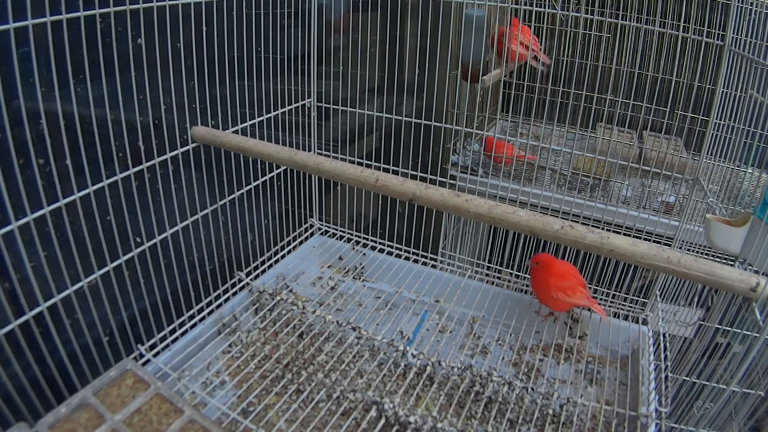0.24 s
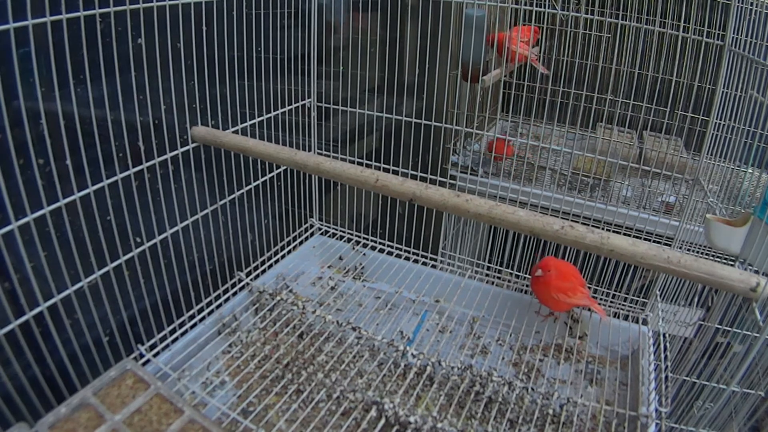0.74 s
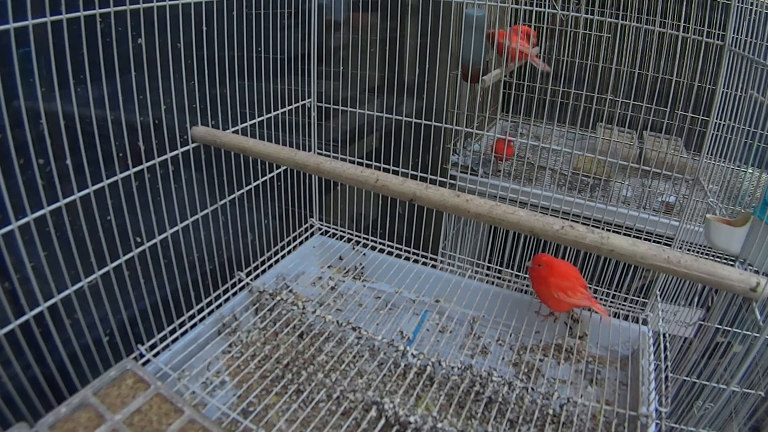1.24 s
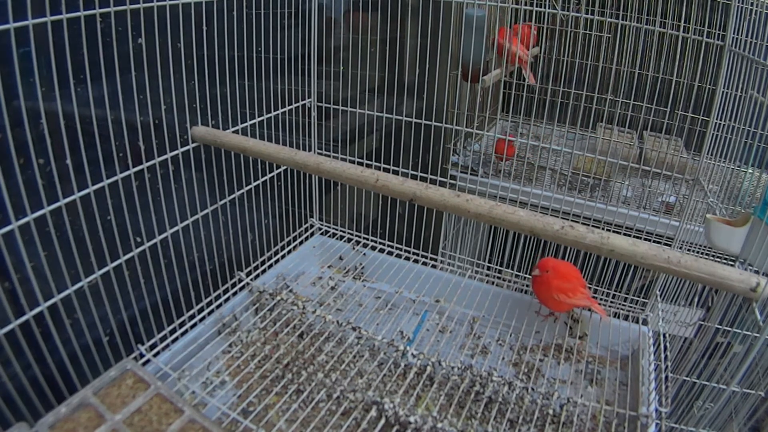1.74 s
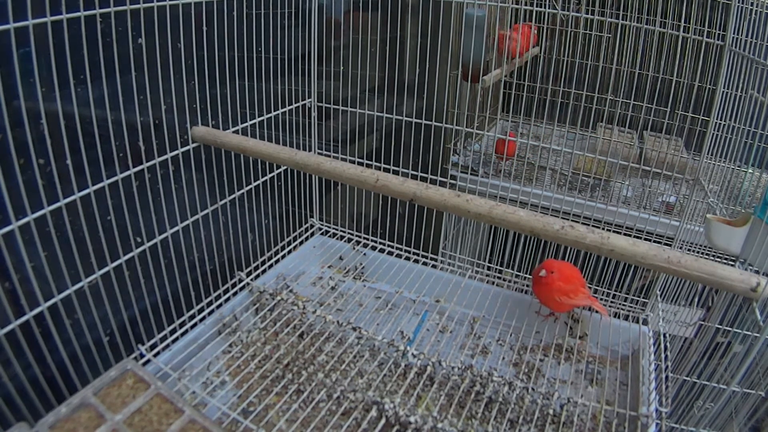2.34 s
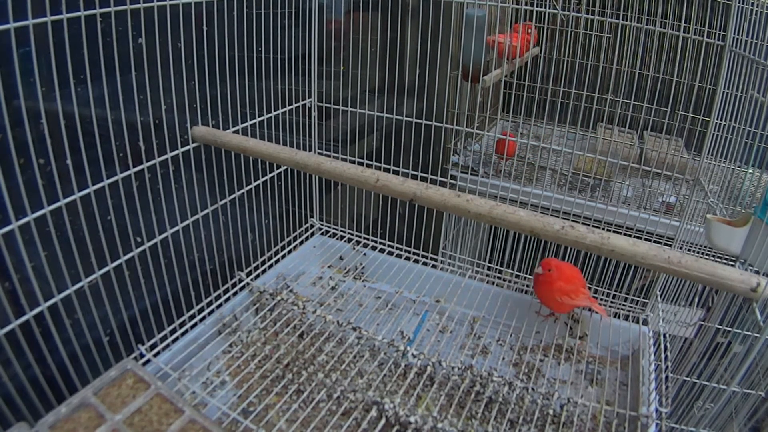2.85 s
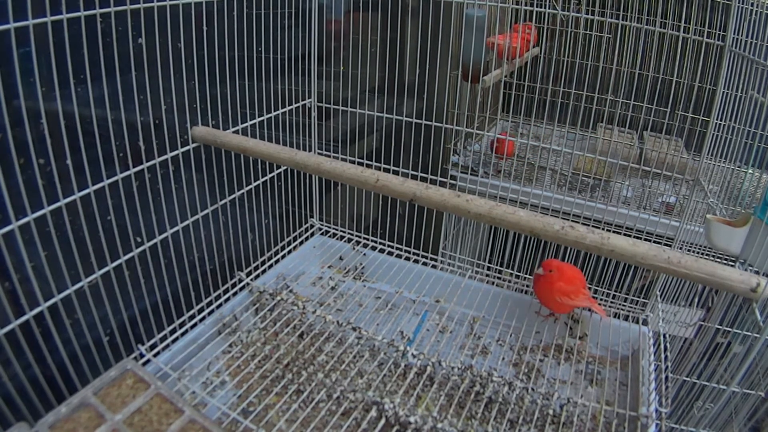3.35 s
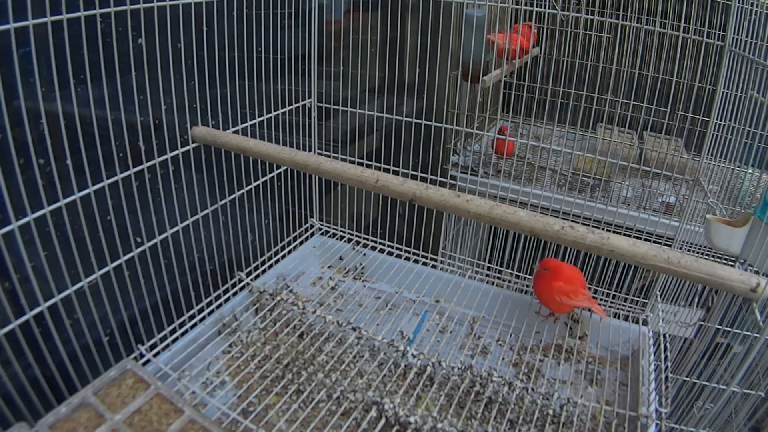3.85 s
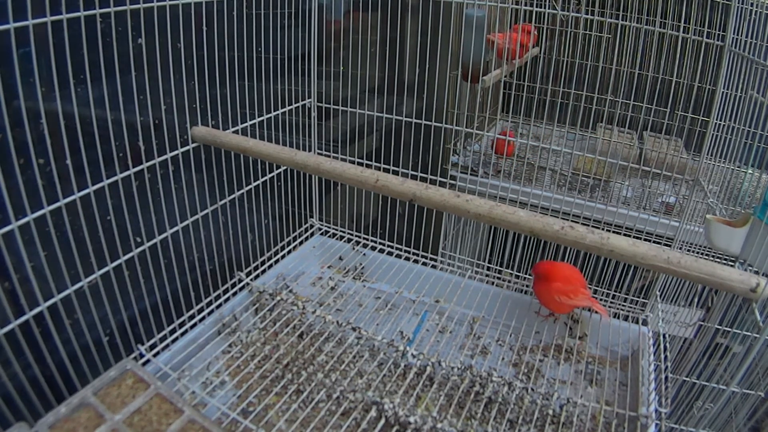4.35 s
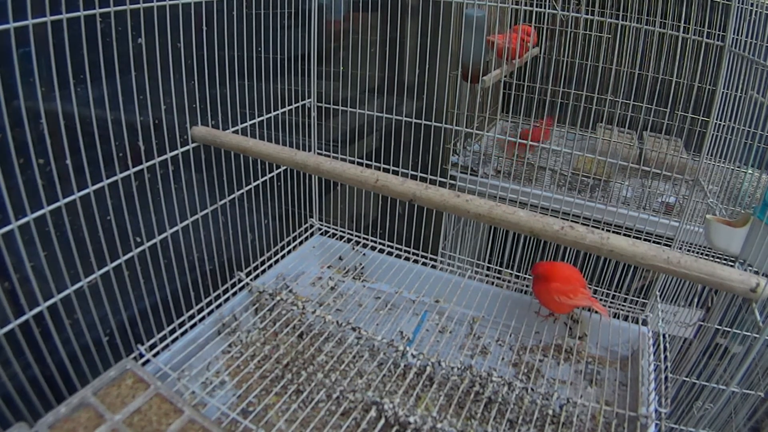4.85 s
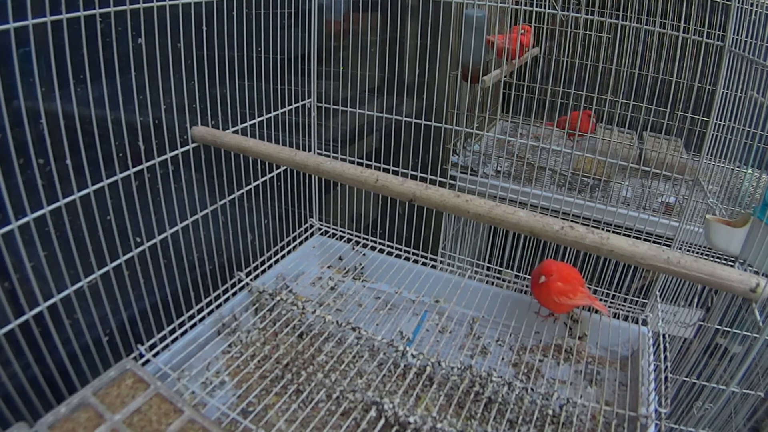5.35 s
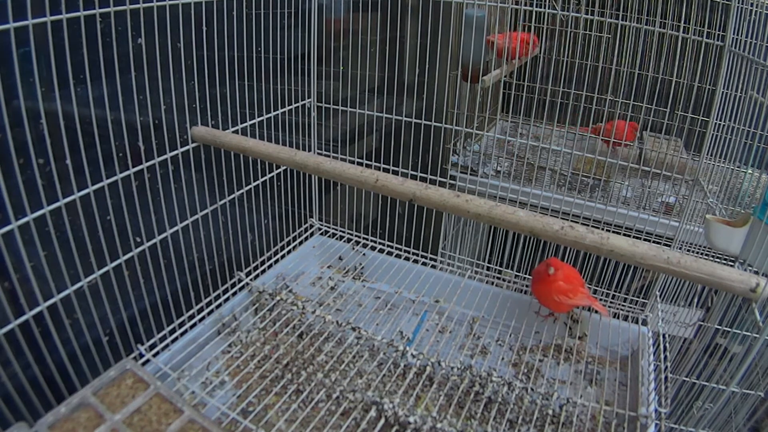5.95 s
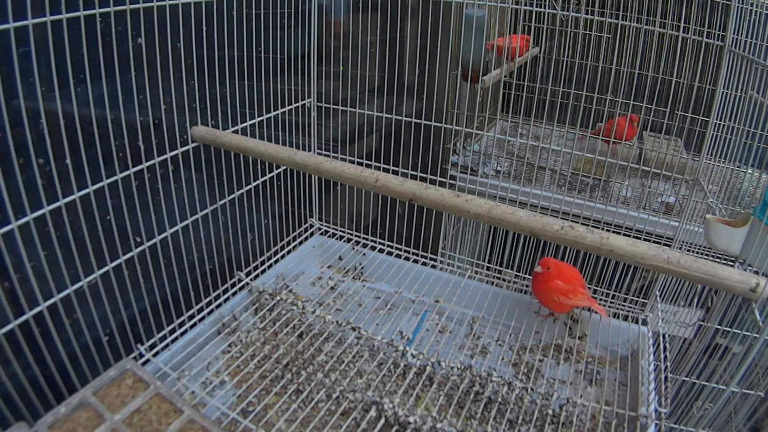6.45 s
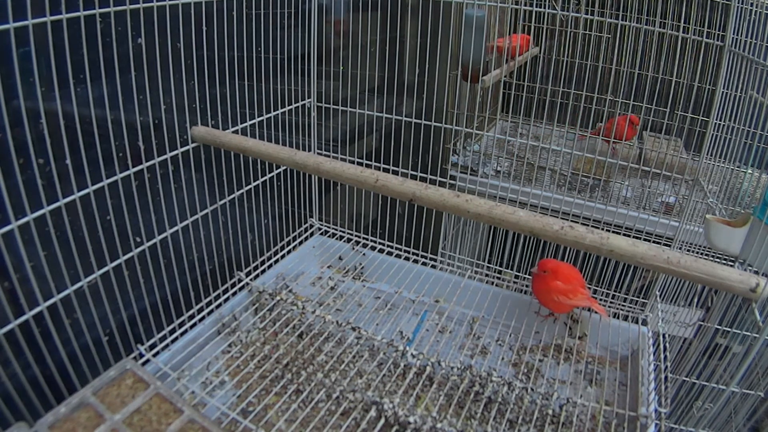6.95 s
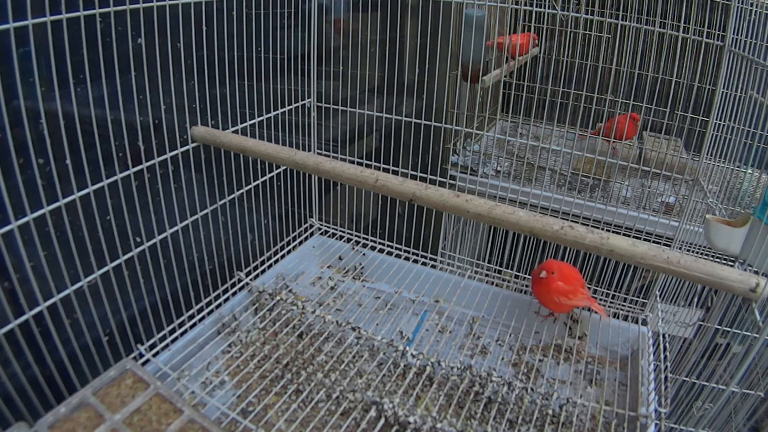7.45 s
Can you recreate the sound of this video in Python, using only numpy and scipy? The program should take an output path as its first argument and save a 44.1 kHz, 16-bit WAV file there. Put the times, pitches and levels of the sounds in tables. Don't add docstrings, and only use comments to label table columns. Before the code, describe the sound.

Several caged canaries sing over one another in a small hard room, fast rattling trills and sharp falling whistles, with wing and wire rustles and faint wind.

```python
import sys
import numpy as np
from scipy import signal
from scipy.fft import rfft, irfft
from scipy.io import wavfile
from scipy.ndimage import uniform_filter1d

SR = 44100
rng = np.random.default_rng(int(sys.argv[2]) if len(sys.argv) > 2 else 0)


def wav_record(signal):
    frames = np.transpose(np.atleast_2d(signal))
    bounded = np.clip(frames, -1, 1)
    quanta = np.round(bounded * 32767).astype(np.int16)
    wavfile.write(sys.argv[1], SR, quanta)


def ratio_of_db(decibels):
    return 10 ** (np.asarray(decibels, float) / 20)


N = 340011
SIDES = np.array([[1], [-1]])


def level(x, db):
    return x * ratio_of_db(db) / np.sqrt(np.mean(x ** 2))


def colour(x, points):
    hz, db = np.transpose(points)
    bins = np.maximum(np.arange(N // 2 + 1) * SR / N, 1)
    return irfft(rfft(x) * ratio_of_db(np.interp(np.log(bins), np.log(hz), db)), N)


def band(x, hz, width_hz):
    return signal.lfilter(*signal.iirpeak(hz, hz / width_hz, fs=SR), x)


def walk(rate):
    hold = int(SR / rate)
    held = rng.standard_normal(N // 8)[np.arange(N) // hold]
    return 1.14 * uniform_filter1d(uniform_filter1d(held, hold), hold)


def add(out, s, piece):
    i = int(s * SR)
    out[i:i + len(piece)] += piece[:N - i]


def syrinx(notes, partials_db, bend=0.4, settle=0.96, edge=0.25, swell_db=0.0, wobble=0.006, flutter_db=6.5):
    out = np.zeros(N)
    waver = 1 + wobble * walk(400)
    for (s, length, start_hz, bend_hz, end_hz, db), partials in zip(notes, partials_db):
        u = np.arange(int(length * SR)) / (length * SR)
        glide = np.interp(u, [0, bend, settle], [start_hz, bend_hz, end_hz])
        glide = uniform_filter1d(glide, len(u) // 4 + 1, mode="nearest")
        i = min(int(s * SR), N - len(u))
        phase = 2 * np.pi * np.cumsum(glide * waver[i:i + len(u)]) / SR
        fades = np.clip(np.minimum(u, 1 - u) / edge, 0, 1)
        effort = fades * ratio_of_db(db + swell_db * (u - 0.5))
        tone = sum(ratio_of_db(p) * np.sin((k + 1) * phase) for k, p in enumerate(partials))
        add(out, s, effort * tone)
    return out * ratio_of_db(flutter_db * walk(250))


def outdoors():
    # time in seconds, wind rumble in dB, coo in dB.
    air = [(0.0, -45, -60), (0.26, -52, -66), (0.97, -47, -69.5), (1.09, -43, -57), (1.87, -50, -68.5),
           (2.38, -47.5, -62), (2.53, -42, -50.5), (2.62, -45, -61), (3.24, -52.5, -71.5), (3.35, -54, -53),
           (3.82, -49.5, -72), (4.12, -57.5, -71), (4.51, -52.5, -73.5), (4.55, -44, -52.5),
           (5.15, -57.5, -71), (5.28, -48.5, -76.5), (5.75, -56.5, -70), (5.91, -48, -84), (6.01, -49, -72),
           (6.21, -46, -42), (6.74, -55.5, -64), (6.83, -54, -63), (6.91, -54, -71), (7.04, -48, -51.5),
           (7.36, -44, -61), (7.49, -48, -53), (7.71, -48, -73)]
    # frequency in Hz, weight in dB per Hz.
    wind_spectrum = [(12, -44), (20, -6.5), (54, 1.5), (70, 2.5), (102, -7.5), (138, -0.5), (193, -5.5),
                     (269, -19.5), (380, -18.5), (490, -51), (840, -120)]
    hiss_spectrum = [(150, -16.5), (250, -1.5), (500, -5), (900, -5), (1400, -4.5), (2500, -2.5),
                     (5000, -7.5), (8000, -10.5), (10500, -18.5), (12000, -36)]
    s, wind_db, coo_db = np.transpose(air)
    mid, side, hum, left, right = rng.standard_normal((5, N))

    wind = level(colour(mid, wind_spectrum), 0) * ratio_of_db(-0.7 * SIDES)
    wind = wind + level(colour(side, wind_spectrum), -19) * SIDES

    coo_hz, coo_width_hz = 416.1, 16
    coo = level(band(band(hum, coo_hz, coo_width_hz), coo_hz, coo_width_hz), 0)

    hiss_db = -50.5
    hiss = level(np.array([colour(left, hiss_spectrum), colour(right, hiss_spectrum)]), hiss_db + 2.0)
    hiss = hiss + level(band(side, 620.0, 450.0), hiss_db - 7.5) * SIDES

    time = np.arange(N) / SR
    gust_db = np.interp(time, s, wind_db) + 1.4 * walk(12)
    swell = ratio_of_db(np.interp(time, s, coo_db))
    return wind * ratio_of_db(gust_db) + coo * swell + hiss * ratio_of_db(0.94 * walk(1.7))


def whistles(rows, swell_db, octave_db=-36, stretch=1.3):
    notes = [(s, stretch * length, *rest) for s, length, *rest in rows]
    return syrinx(notes, [(0.017, octave_db)] * len(notes), bend=0.31, settle=0.78, edge=0.096,
                  swell_db=swell_db, wobble=0.013, flutter_db=2.5)


def trill():
    # start in seconds, peak level in dB, held pitch in Hz.
    phrases = [
        [(0.0164, -25.5, 2880)] + [(0.0588, -28, 2705), (0.0982, -20.5, 3000), (0.159, -25.5, 2890), (0.2324, -19.5, 2680), (0.2853, -25, 3400), (0.3411, -30, 2640), (0.4015, -42, 2500), (0.4923, -22.5, 3540), (0.5332, -20, 3610), (0.6055, -23.5, 3440), (0.6469, -25, 3430), (0.6993, -17.5, 3460), (0.7452, -22, 3400), (0.7876, -17.5, 3446), (0.8395, -18.5, 3480), (0.8979, -19, 3540), (0.9383, -21.5, 3460), (0.9951, -19, 3270), (1.0445, -18.5, 3430)],
        [(1.1263, -29.5, 2656), (1.1794, -30, 2824), (1.2201, -27.5, 2680)] + [(1.2879, -23.5, 3270), (1.3572, -32.5, 3290), (1.3931, -27.5, 3530), (1.453, -34, 3170), (1.5513, -34, 2830), (1.6086, -32.5, 2920), (1.672, -35, 2456), (1.7209, -37, 2830), (1.7852, -37, 2820), (1.8256, -34.5, 2870), (1.88, -33, 2805), (1.9434, -36, 2960), (1.9903, -32.5, 2916), (2.0456, -33.5, 2920), (2.1015, -32.5, 2850), (2.1534, -30.5, 2590), (2.2088, -25, 3030), (2.2701, -27.5, 2880), (2.327, -26.5, 2750), (2.3764, -32, 3200), (2.4328, -29, 3220), (2.4792, -23.5, 2950), (2.5255, -25.5, 3166), (2.5719, -27, 2790), (2.6099, -28.5, 2900), (2.6543, -25.5, 2916), (2.7056, -25.5, 2995), (2.7485, -31, 2810), (2.7939, -31, 2820), (2.8373, -22.5, 2970), (2.8877, -26.5, 2960), (2.9281, -18, 2933), (2.985, -23.5, 3028), (3.0354, -36.5, 2770), (3.0873, -30.5, 2820), (3.1441, -27.5, 2984), (3.199, -30.5, 3084), (3.2559, -25, 2820), (3.3227, -23, 3103), (3.3836, -23, 3056), (3.4415, -22, 3210), (3.5003, -21, 2950)] + [(3.5563, -20.5, 3200), (3.6227, -29, 3090), (3.6865, -26.5, 3100)],
        [(3.7778, -18.5, 2580), (3.8132, -23.5, 2704), (3.8611, -19.5, 2646), (3.9394, -25, 2530), (4.0247, -21, 2780), (4.0676, -22.5, 2680), (4.1345, -16, 2578), (4.2058, -19, 2668), (4.2906, -20.5, 2490), (4.3839, -19.5, 2540), (4.4283, -21, 2540)],
        [(4.9952, -23.5, 2694), (5.0301, -25.5, 2700), (5.065, -24.5, 2890), (5.1099, -21, 2575), (5.1563, -23.5, 3130), (5.1962, -24.5, 2790), (5.2451, -21, 2850), (5.311, -12, 3066), (5.3469, -15, 3054), (5.3903, -10.5, 3324), (5.4861, -12, 3050), (5.5479, -20.5, 2750), (5.5789, -22.5, 2840), (5.6163, -19.5, 3194), (5.6991, -16, 2780), (5.7485, -14, 3016), (5.7964, -17.5, 3496), (5.8408, -22, 2690), (5.8737, -19.5, 3700), (5.9316, -19, 3540), (5.973, -27, 2900), (6.0074, -27, 2970), (6.0483, -21, 3360), (6.0972, -23, 2850), (6.1371, -21.5, 3530), (6.188, -21, 3400), (6.2329, -21.5, 3385), (6.3092, -29.5, 3370)],
        [(6.3357, -16.5, 3150), (6.4006, -22.5, 3550), (6.5054, -23.5, 3060), (6.5513, -26, 3180), (6.5992, -32.5, 3220), (6.6391, -23.5, 2900), (6.6984, -23.5, 2934), (6.7488, -20.5, 2890), (6.7942, -21.5, 2960), (6.8461, -27, 3180), (6.8835, -17.5, 2940), (6.9474, -18.5, 3130)],
        [(6.9398, -19.5, 2875), (6.9837, -28, 3097), (7.0401, -20, 3140), (7.078, -25, 3270), (7.1493, -23.5, 3033), (7.2052, -32, 3150), (7.2486, -20.5, 3010), (7.3514, -17, 3170), (7.4092, -18.5, 2425), (7.4846, -20.5, 2710), (7.5389, -21, 2515), (7.6272, -26, 2927), (7.6766, -22.5, 2620)],
    ]
    # start pitch as share of held, length in seconds, buzz from 0 to 1,
    # level shift in dB, pitch in Hz and level in dB of the answering side of the syrinx.
    manners = [(0.801, 0.0346, .3, -7, 2420, -15.5), (.93, 0.0334, 0.098, 2, 2188, -15),
               (1.1, 0.0478, .1, -8.5, 2207, -16.5), (0.802, 0.0347, .4, -6.5, 2275, -22.5),
               (.97, .04, 0.18, -8, 2600, -19.5), (1.08, 0.0414, 0.45, -10.5, 2490, -9.5)]
    answer_s = 0.024
    out = 0
    for rows, (share, length, buzz, shift_db, low_hz, low_db) in zip(phrases, manners):
        notes = [(s - 0.002, length, share * hz, hz, hz, db + shift_db) for s, db, hz in rows]
        notes += [(s + answer_s, length, 0.92 * low_hz, low_hz, 1.12 * low_hz, db + shift_db + low_db)
                  for s, db, hz in rows]
        tone = syrinx(notes, [(0, -30)] * len(notes), bend=0.2985, edge=0.068, swell_db=1,
                      wobble=0.015, flutter_db=2.0)
        out = out + tone * (1 + buzz * walk(700))
    return out


def flock(song):
    # frequency in Hz, weight in dB per Hz.
    haze_spectrum = [(800, -23), (1300, -14.5), (1800, -12), (2300, 6.5), (3100, 10.5), (3800, -5.5),
                     (6500, -14.5), (10000, -29)]
    loudness = np.abs(uniform_filter1d(np.abs(song), int(0.015 * SR)))
    haze = level(colour(rng.standard_normal(N), haze_spectrum), 0)
    return level(loudness, -38) * haze


def rustles():
    # start in seconds, peak level in dB, decay in seconds, lows and middle against highs in dB.
    bursts = [(0.0613, -25, 0.005, -10, 1.8), (0.3396, -10, 0.0092, -9.5, 1.2),
              (0.7332, -40, 0.005, -8.5, 1.2), (0.7915, -32.5, 0.0125, -11, 1.5),
              (1.1378, -22, 0.011, -14.5, 1.9), (1.652, -39, 0.016, 6, 1.5), (2.0413, -28, 0.005, -9, 1.3),
              (2.2808, -30.5, 0.027, -10, 1.7), (2.8789, -27, 0.01, -8, 1.5),
              (2.9205, -22.5, 0.011, -21, 2.5), (2.951, -33.5, 0.015, -9, 1.5),
              (2.9794, -27, 0.014, -21.5, 1.5), (3.852, -46, 0.012, 36, 1.5), (4.829, -41, 0.015, 13, 1.5),
              (4.9257, -33, 0.013, -1, 1.5), (4.9944, -31.5, 0.015, -22, 3.3),
              (5.396, -46, 0.015, -21, 2.5), (5.7498, -19.5, 0.017, -36, 3.3),
              (5.769, -25, 0.016, -29, 4.5), (5.7982, -38, 0.015, -11, 1.5),
              (5.9413, -32.5, 0.015, -9, 1.6)]
    # resonance in Hz, its width in Hz, level in dB.
    wire = [
        (1340, 117, 1),
        (5200, 800, 0.5),
        (7900, 12000, 1.5),
    ]
    grains = rng.standard_normal(N) * ratio_of_db(8.0 * walk(600))
    low, mid, high = (level(band(grains, hz, width_hz), db) for hz, width_hz, db in wire)
    out = np.zeros(N)
    for s, db, length, low_db, mid_db in bursts:
        i = int(s * SR)
        fade = np.exp(-np.arange(6000) / (max(length, 0.002) * SR))
        part = slice(i, i + len(fade))
        ring = ratio_of_db(min(low_db, 0)) * low[part] + ratio_of_db(mid_db) * mid[part] + high[part]
        add(out, s, ratio_of_db(db - 14) * fade * ring)
    return out


def roll():
    # time in seconds, peak level in dB, top pitch in Hz.
    flicks = [(0.1048, -19, 3720), (0.1512, -21.5, 3990), (0.2215, -17, 3890), (0.2864, -20, 4150),
              (0.3343, -39, 4030), (0.437, -23, 3750), (0.4804, -16, 3710), (0.5313, -27.5, 3710),
              (0.6041, -20, 3765), (0.6545, -22, 4050), (0.7049, -36.5, 3740), (0.7553, -21, 3640),
              (0.7987, -22, 3750), (0.8396, -18.5, 3650), (0.891, -21.5, 3850), (0.9384, -24, 3900),
              (0.9803, -25, 3560), (1.0317, -19, 3920), (5.0394, -34, 4000), (5.1497, -25, 3850),
              (5.249, -24, 3710), (5.3582, -18.5, 3780), (5.4301, -28, 3790), (5.5494, -21, 3680),
              (5.6294, -17, 3770), (5.7242, -13, 3700), (5.7826, -27, 3690), (5.8394, -38, 3700),
              (5.8858, -35, 3740), (5.9292, -22, 4120), (5.9721, -21, 3680), (6.0125, -18, 3810),
              (6.0559, -19.5, 4020), (6.1038, -20, 3950), (6.1417, -22, 4040), (6.1836, -19.5, 3810),
              (6.237, -24.5, 3740)]
    length, low_hz = 0.03, 2300
    second_s, second_db = 0.02, -3
    notes = [(s - 0.012, length, low_hz, 0.93 * hz, 1.11 * hz, db) for s, db, hz in flicks]
    notes += [(s + second_s, *rest, db + second_db) for s, *rest, db in notes]
    tone = syrinx(notes, [(0, -29)] * len(notes), bend=0.5, edge=0.24, wobble=0.017)
    return tone * ratio_of_db(-17) * (1 + 0.48 * walk(800))


def calls():
    # start and length in seconds, start, bend and end pitch in Hz, level of 2nd partial in dB.
    nasal = [
        (1.088, 0.065, 3834, 3620, 2940, -31.5),
        (3.528, 0.087, 1826, 2086, 2986, -24),
        (3.625, 0.095, 2910, 2765, 2681, -33),
        (4.435, 0.12, 1958, 2741, 2868, -32),
        (4.525, 0.15, 2820, 2788, 2787, -41.5),
        (4.473, 0.1, 1733, 2192, 2152, -35.5),
        (4.569, 0.156, 2030, 2087, 2170, -45.1),
        (5.504, 0.098, 2074, 2907, 2830, -30),
        (6.696, 0.11, 1955, 2190, 2846, -31),
        (6.8, 0.11, 2672, 2755, 2750, -29.5),
    ]
    overtones = [(11.5, -28.5), (-16, -17.5), (14.5, -10.5), (0.5, -22), (8.5, -25), (-7, -20), (3, -31),
                 (-5, -21), (-7, -20.5), (-1, -25)]
    stacks = [(first, 0, third, third - 12) for first, third in overtones]
    return syrinx(nasal, stacks, edge=0.09, swell_db=3.5, wobble=0.0063, flutter_db=4.0) * ratio_of_db(1.5)


def shed(sound, wet_db, likeness, early_db=3.0, early_s=0.005):
    gap_s, t60_s = 0.002, 0.32
    t = np.arange(26000) / SR
    shared, own = rng.standard_normal((2, len(t)))
    fade = ratio_of_db(-60 * t / t60_s + early_db * np.exp(-t / early_s)) * (t > gap_s)
    tails = (np.sqrt(1 + likeness) * shared + np.sqrt(1 - likeness) * own * SIDES) * fade
    tails /= np.sqrt(np.mean(np.sum(tails ** 2, axis=1)))
    return sound + ratio_of_db(wet_db) * signal.fftconvolve(sound[None], tails, axes=1)[:, :N]


def scene():
    # start and length in seconds, start, bend and end pitch in Hz, level in dB.
    pipes = [(0.014, 0.045, 4870, 5020, 4850, -26.5), (0.229, 0.028, 5500, 5700, 5500, -51),
             (0.397, 0.038, 2360, 2520, 3200, -37), (0.552, 0.053, 2440, 2480, 2860, -33.5),
             (0.555, 0.022, 4930, 5000, 4700, -42), (0.558, 0.03, 4890, 4900, 5350, -40.4),
             (0.611, 0.015, 1470, 1395, 1405, -46.5), (1.18, 0.06, 5220, 5646, 3850, -19),
             (1.3, 0.053, 6100, 4740, 4160, -21.5), (1.41, 0.05, 5600, 4830, 4406, -21.5),
             (1.426, 0.045, 2500, 2500, 2500, -37.2), (2.284, 0.061, 3780, 4330, 5120, -34.5),
             (2.468, 0.06, 5960, 4850, 4223, -23), (2.601, 0.053, 6560, 5110, 4676, -21.5),
             (4.125, 0.023, 5400, 5270, 4500, -39.5), (4.19, 0.022, 5760, 5300, 4800, -52),
             (4.999, 0.038, 4480, 4120, 4375, -36), (5.112, 0.032, 4200, 4050, 4070, -42.5),
             (5.295, 0.068, 3950, 5080, 4700, -35), (5.601, 0.045, 4120, 4414, 4360, -33.5),
             (6.327, 0.03, 6810, 6100, 6350, -39.5), (6.348, 0.03, 4430, 4250, 4170, -46),
             (6.389, 0.038, 3660, 3580, 3290, -29.5), (6.399, 0.026, 4940, 4040, 3960, -31),
             (6.392, 0.032, 7160, 7000, 6630, -47.5), (6.502, 0.062, 5700, 4243, 3820, -32),
             (6.645, 0.07, 5660, 4310, 3826, -32), (6.807, 0.054, 5480, 4200, 3850, -28),
             (6.947, 0.066, 5200, 4150, 3843, -27), (7.097, 0.068, 5340, 4510, 3820, -29),
             (7.189, 0.061, 6460, 5090, 4075, -29.5), (7.286, 0.039, 5370, 4760, 4070, -30.5),
             (7.349, 0.046, 6440, 5300, 3760, -27), (7.423, 0.048, 5240, 5120, 4080, -32.5),
             (7.503, 0.045, 5330, 4740, 4236, -26), (7.575, 0.068, 5530, 4660, 4170, -31),
             (7.671, 0.034, 4980, 5110, 4810, -34)]
    turn_s, last_s = 2.0, 6.45
    near_like, far_like = 0.79, 0.13

    first = whistles([row for row in pipes if row[0] < turn_s], swell_db=-1.5, stretch=1.08)
    front = first * ratio_of_db(4.5) + calls() + rustles()
    back = whistles([row for row in pipes if turn_s < row[0] < last_s], swell_db=-4.5) * ratio_of_db(2.0)
    last = whistles([row for row in pipes if row[0] > last_s], swell_db=8.0, octave_db=-18.5, stretch=0.95)
    last = band(last, 4520.0, 1380.0) * ratio_of_db(3.5)
    far = trill() * ratio_of_db(-4.5)

    birds = shed(front, 0.59, near_like) + shed(back, 4.5, near_like)
    birds = birds + shed(last, 8.36, near_like, early_db=4.5, early_s=0.029)
    birds = birds + shed(roll(), 10.3, far_like) + shed(far + flock(far), 5.0, far_like)

    lag_rad = 0.74
    lag = np.exp(-0.5j * lag_rad * SIDES)
    return irfft(rfft(birds) * lag, N) + outdoors()


def band_limit(x):
    return signal.sosfilt(signal.butter(12, 11490, fs=SR, output="sos"), x)


def record(dry):
    cut = signal.sosfilt(signal.ellip(10, 0.2, 80, 11050, fs=SR, output="sos"), dry)
    return band_limit(cut)


dry = scene()
out = record(dry)
wav_record(out)
```